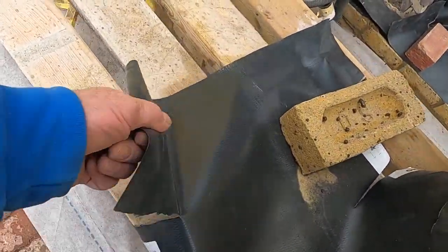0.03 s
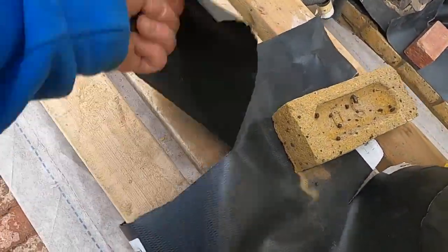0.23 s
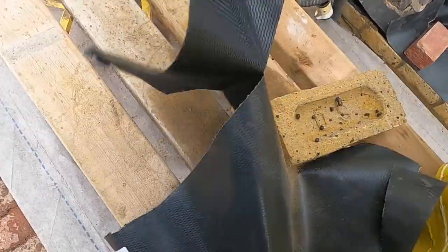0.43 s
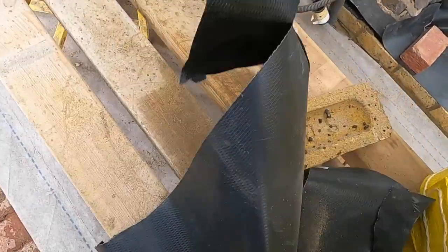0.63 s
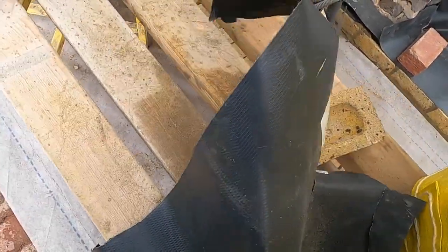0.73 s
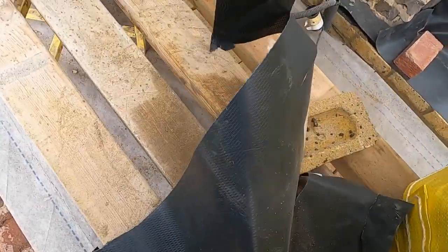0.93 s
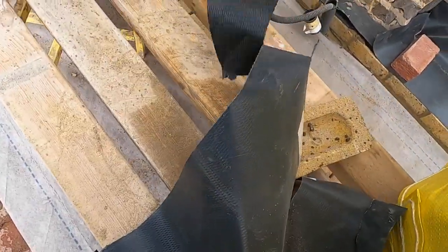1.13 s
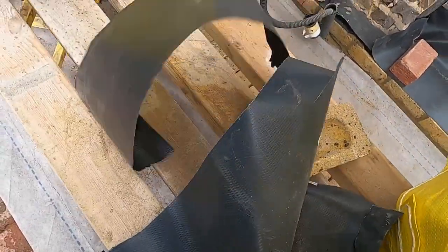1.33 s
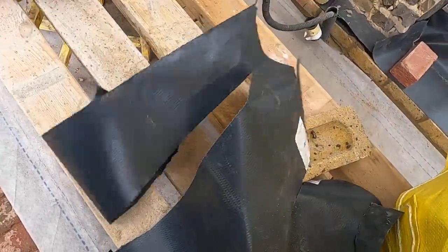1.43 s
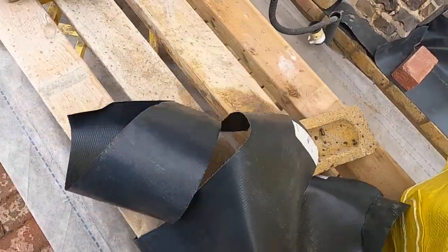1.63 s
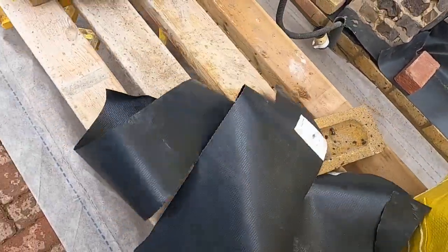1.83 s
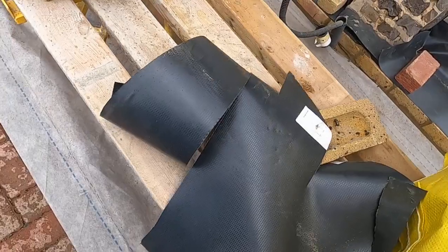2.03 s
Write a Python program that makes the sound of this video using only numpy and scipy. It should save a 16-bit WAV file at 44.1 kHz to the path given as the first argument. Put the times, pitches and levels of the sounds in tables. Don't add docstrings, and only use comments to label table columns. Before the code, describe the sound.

A tough plastic membrane tears with a loud rasping rip, then snaps, thumps and rustles down

```python
import sys
import numpy as np
from scipy import signal
from scipy.io import wavfile
from scipy.ndimage import uniform_filter1d

SR = 44100
rng = np.random.default_rng(int(sys.argv[2]) if len(sys.argv) > 2 else 0)


def attenuation_scalar(level_db):
    decades = np.asarray(level_db, float) / 20
    return 10 ** decades


def materialize(psi):
    bounded = np.clip(np.atleast_2d(psi).T, -1, 1)
    quanta = np.round(bounded * 32767).astype(np.int16)
    wavfile.write(sys.argv[1], SR, quanta)


N = 91948

# t/s, level/dB
ROAR = [(.236, -32), (.256, -17.5), (.30, -38.5), (.37, -23), (.43, -24), (.455, -25), (.472, -22.5),
        (.505, -17.5)]
# t/s, peak level/dB
FAST_JERKS = [(.2595, -1.5), (0.2654, -3), (0.2738, -14), (0.2807, -9), (0.2883, 0), (0.2972, -1),
              (0.3061, -11.5), (0.3112, -8.4), (0.3159, -7), (0.3229, -14.5), (0.3314, -5), (0.335, -22),
              (0.341, -4.5), (0.348, -13), (0.3529, -17), (0.3569, -16), (0.3629, -14), (0.3698, -5),
              (0.379, -21), (0.3877, -22), (0.3925, -14), (0.398, -8), (0.407, -12.5), (0.4204, -12),
              (0.4314, -17), (0.4365, -27), (0.445, -14), (0.4525, -7), (0.4699, -7.5), (0.474, -16),
              (0.4856, -2.5), (0.4922, -23)]
# t/s, peak level/dB
SLOW_JERKS = [(0.5, -13), (0.509, -11.5), (0.512, -9.5), (0.528, -6.5), (0.536, -18), (0.544, -12.5),
              (0.552, -13.5), (0.561, -12.5), (0.571, -10.5), (0.58, -17.5), (0.607, -12.5), (0.623, -12),
              (0.634, -17), (0.639, -27), (0.657, -17.5), (0.665, -20), (0.699, -16), (0.716, -21.5),
              (0.73, -12), (0.743, -29), (0.757, -26), (0.77, -16), (0.778, -19), (0.782, -37),
              (0.795, -16), (0.812, -17), (0.829, -44), (0.842, -17.5), (0.845, -18)]
# f/Hz, width/Hz, level/dB
SHEET_RESONANCES = [(670, 189, -3), (1106, 287, -4), (2230, 375, 0.5), (3180, 930, -5), (4250, 1130, -6),
                    (6450, 2900, -13.5)]
# t/s, level/dB
TENSION = [(.225, -27), (.265, -15), (.40, -14), (.435, -20.5), (.462, -33), (.484, -18.5), (.57, -27),
           (.62, -30), (.86, -31.5), (.9, -42)]
# f/Hz, level/dB, t60/s
DRUM_MODES = [(106, -41, .08), (144, -5.5, 0.052), (174, -3.5, 0.044), (199.6, 1.5, 0.075),
              (275.5, 0, 0.056), (380, 2, 0.029)]
# t/s, peak level/dB, ring f/Hz, ring t60/s, crack top f/Hz
SNAPS = [(.242, -12.5, 922, 0.023, 3170), (1.053, -28, 854, 0.042, 1520), (1.099, -26.5, 747, 0.012, 2460),
         (1.179, -24.5, 4200, 0.012, 8000), (1.448, -11.5, 1300, 0.066, 3100),
         (1.549, -22, 1680, 0.017, 1560), (1.592, -20, 4540, 0.037, 6200),
         (1.64, -12.5, 2770, 0.0081, 3550), (1.698, -21.5, 3700, 0.014, 3070),
         (1.714, -12.5, 2540, 0.026, 3300), (1.729, -20, 2240, 0.016, 2560),
         (1.807, -14, 1435, 0.0062, 5430), (1.897, -22, 810, 0.084, 1500),
         (1.914, -22.5, 1830, 0.032, 1960), (2.053, -26.5, 950, 0.032, 1150)]
# t/s, peak level/dB, f/Hz
TICKS = [(0.0258, -21.5, 1150), (0.0307, -27, 1390), (0.0381, -27, 1205), (0.046, -20.1, 1170),
         (0.0574, -26, 1068), (0.0661, -28, 1184), (0.0787, -21, 1076), (0.0905, -31, 3200),
         (0.1008, -16, 2600), (0.1108, -13, 3180), (0.116, -28, 3294), (0.1317, -20, 3220),
         (0.1574, -26, 3140), (0.1664, -13, 3294), (0.173, -15, 2710), (0.1766, -20.6, 1030),
         (0.1835, -18, 2906), (0.1966, -22, 3725), (0.2044, -31, 1070), (0.213, -14, 3280),
         (1.0569, -23, 1010), (1.0635, -21, 760), (1.0714, -19, 2800), (1.0866, -28, 2100),
         (1.348, -37, 1300), (1.3527, -37, 1170), (1.3664, -21.5, 1744), (1.3827, -22, 1076),
         (1.388, -27, 3337), (1.3916, -25, 1410), (1.398, -27, 747), (1.408, -50, 1916),
         (1.4182, -29, 1700), (1.4283, -23, 2400),
         (0.593, -21, 2070), (1.47, -27, 1130), (1.479, -28, 1162), (1.522, -23, 2740),
                  (1.5335, -25.5, 2900), (1.543, -19.5, 1140), (1.621, -32, 830), (1.646, -38, 2200),
                  (1.693, -17, 2750), (1.749, -26, 1980), (1.819, -34, 1313), (1.832, -17, 1260),
                  (1.857, -19, 4543), (1.883, -16, 900), (1.888, -31, 1227), (1.937, -25, 2090),
                  (1.959, -29, 2734), (1.978, -25, 1080), (2.019, -36, 1790), (2.036, -30, 1000)]
# t/s, peak level/dB, f/Hz, decay/cycles
THUMPS = [
    (0.5879, -12, 187, 18.6),
    (1.102, -15.5, 165, 3.5),
    (1.548, -15, 187, 6),
    (1.639, -19.5, 268, 4.5),
    (1.701, -18.5, 134, 2.5),
    (1.864, -16.5, 119, 2.1),
    (1.941, -16, 135, 3.5),
    (1.984, -11.5, 227, 1.6),
    (2.008, -15, 90.5, 1.8),
]
# start t/s, length/s, level/dB, grip share/0-1
SLIDES = [(-.08, 0.24, -39.5, 1), (0.049, 0.18, -34.5, 1), (0.234, 0.13, -23, 0.03),
          (0.393, 0.16, -27, 0.02), (0.638, 0.067, -29, 0.96), (0.677, 0.17, -34.5, 1),
          (0.579, 0.073, -37, 0.05), (0.956, 0.036, -50, 1), (1.038, 0.039, -37, 1),
          (1.231, 0.095, -48, 0.01), (1.337, .055, -34, 0), (1.491, 0.093, -31, 0.39), (1.6, .03, -37, .1),
          (1.662, 0.057, -36, 0), (1.828, 0.13, -36, 0), (1.935, 0.09, -36, 0), (2, 0.059, -53, 0)]
# start t/s, level/dB, decay/s
SHIVERS = [
    (0.862, -41, 0.042),
    (1.177, -42.5, 0.0066),
    (1.449, -25.5, 0.038),
    (1.636, -33.5, 0.053),
    (1.729, -35, 0.076),
    (1.808, -32, 0.22),
]
# f/Hz, density level/dB per Hz
LOOSE_SPECTRUM = [(250, -3.5), (460, -3.5), (700, -5.5), (2000, -6), (4000, -13.5), (8000, -23.5),
                  (12500, -94), (15500, -57)]
# f/Hz, density level/dB per Hz
GRIPPED_SPECTRUM = [(250, 1.5), (980, 4), (1800, 0), (3250, 0.5), (4600, -12), (7000, -20.5), (12000, -62),
                    (15500, -57)]
# lag/s, left level/dB, right level/dB
ECHOES = [(.0011, -24.5, -27.5), (.0023, -21, -24.5), (.0047, -13.5, -28)]
# f/Hz, correlation/-1 to 1
LIKENESS = [(30, -.1), (70, .2), (150, .95), (1000, .85), (2500, .9), (5000, .35), (10000, -.1)]
# t/s, level/dB
GUSTS = [
    (0, -28),
    (.2, -32.5),
    (.4, -57),
    (.6, -74),
    (.95, -41.5),
    (1.3, -40),
    (1.6, -32.5),
    (1.8, -32),
    (2.0, -28),
    (2.085, -30.5),
]
# f/Hz, density level/dB per Hz
WIND_SPECTRUM = [(20, -5.5), (45, -0.5), (85, -5), (150, -9.5), (350, -25)]
# f/Hz, density level/dB per Hz
SITE_SPECTRUM = [(200, -15.5), (490, -10.5), (1000, -7.5), (2500, -14), (5800, -26.5), (15500, -53)]

JERK_S, JERK_GAIN_DB, JERK_SPIKE = 0.00065, -1, 2.39
LOW_GROWS_DB_PER_S = 26.5
FAST_GAIN_DB, FAST_SMEAR_HZ = 2, 132
ROAR_SHARE, ROAR_GAIN_DB = 0.28, 10.5
COLOUR_SPREAD_DB, TEAR_TOP_HZ, DRUM_NOISE = 0.5, 5820, 0.4
SNAP_SPIKE, RING_KICK, CRACK_T60_S = 4.5, 7, 0.012
SNAP_CRACK_DB, SNAP_RING_DB, SNAP_AIR_HZ = 10.5, -0.5, 11000
TICK_S, TICK_WIDTH, TICK_BROAD = 0.001, 1.154, 0.72
TICK_GAIN_DB, TICK_TOP_HZ = -5.5, 5200
THUMP_SOFT_HZ = 900
GRAINS_PER_S, GRAIN_SPREAD_DB, CLUMP_DB, RUSTLE_PATCH_DB = 1800, 4.5, 3.5, 2.2
SLIDE_RISE, SLIDE_FALL_S = 0.45, 0.014
LEFT_LAG, PORT_SPLIT_HZ, PORT_SPLIT_DB, LOW_SIDE_DB = 2, 4500, -4.0, -21
WIND_LEFT_DB, SITE_DB = 1.5, -50.5
RIGHT_LIFT_DB, RIGHT_LIFT_HZ, TOP_HZ = 7.0, 10000, 15950


def rms_one(x):
    return x / np.sqrt(np.mean(x ** 2) + 1e-20)


def in_time(rows):
    t, level_db = np.transpose(rows)
    return np.interp(np.arange(N) / SR, t, level_db, left=-90, right=-90)


def at_hz(points, hz):
    f, value = np.transpose(points)
    return np.interp(np.log(hz), np.log(f), value)


def drift(rate_hz):
    r = np.exp(-2 * np.pi * rate_hz / SR)
    wander = signal.lfilter([1], [1, -2 * r, r * r], rng.standard_normal(N + 9000))
    return rms_one(wander[9000:])


def ring(x, hz, t60):
    r, w = attenuation_scalar(-60 / (t60 * SR)), 2 * np.pi * hz / SR
    return signal.lfilter([0, np.sin(w)], [1, -2 * r * np.cos(w), r * r], x + 1e-18)


def cut(x, hz, kind, order=2):
    return signal.sosfilt(signal.butter(order, hz, kind, fs=SR, output="sos"), x)


def clicks(s, db):
    out = np.zeros(N)
    np.add.at(out, (np.asarray(s) * SR).astype(int), attenuation_scalar(db))
    return out


def banded(spectrum, patchy_db, rate_hz, source):
    lowest, highest = spectrum[0][0], spectrum[-1][0]
    edges = np.geomspace(lowest, highest, int(2 * np.log2(highest / lowest)) + 2)
    out = 0
    for k, (low, high) in enumerate(zip(edges, edges[1:])):
        mid, side = cut(source[k % 2], [low, high], "band")
        hz = np.sqrt(low * high)
        alike = np.clip(at_hz(LIKENESS, hz), -1, 1)
        gain = attenuation_scalar(at_hz(spectrum, hz) + patchy_db * drift(rate_hz))
        out = out + gain * (np.sqrt(1 + alike) * mid + np.sqrt(1 - alike) * side * [[1], [-1]])
    return rms_one(out)


def fracture():
    fast_s, fast_db = np.transpose(FAST_JERKS)
    s, db = np.transpose(SLOW_JERKS)
    noise = rng.standard_normal(N)
    noise[(s * SR).astype(int)[:, None] + int(JERK_S * SR) + np.arange(5)] = JERK_SPIKE
    fast = cut(clicks(fast_s, fast_db + FAST_GAIN_DB), FAST_SMEAR_HZ, "low", order=1)
    roar = ROAR_SHARE * noise * attenuation_scalar(in_time(ROAR) + ROAR_GAIN_DB)
    decay = np.exp(-1 / (JERK_S * SR))

    def bursts(extra_db):
        hits = fast + clicks(s, db + extra_db + JERK_GAIN_DB)
        envelope = signal.lfilter([np.e * (1 - decay)], [1, -2 * decay, decay ** 2], hits)
        return noise * envelope + roar

    high, low = bursts(0), bursts(LOW_GROWS_DB_PER_S * (s - s[0]))
    crack = 0
    for k, (hz, width_hz, peak_db) in enumerate(SHEET_RESONANCES):
        r, w = np.exp(-np.pi * width_hz / SR), 2 * np.pi * hz / SR
        zeros, poles = [(1 - r * r) / 2, 0, (r * r - 1) / 2], [1, -2 * r * np.cos(w), r * r]
        gain = (-1) ** k * attenuation_scalar(peak_db + 5.5 + COLOUR_SPREAD_DB * drift(53.0))
        crack = crack + gain * signal.lfilter(zeros, poles, (low if k < 2 else high) + 1e-18)
    return cut(crack, TEAR_TOP_HZ, "low", order=3)


def drumming():
    fast_s, s = np.transpose(FAST_JERKS)[0], np.transpose(SLOW_JERKS)[0]
    pushes = clicks(fast_s, 0 * fast_s) + clicks(s, 0 * s)
    push = rms_one(pushes) + DRUM_NOISE * rng.standard_normal(N)
    drum = -sum(attenuation_scalar(db) * ring(push, hz, t60) for hz, db, t60 in DRUM_MODES)
    level = np.sqrt(uniform_filter1d(drum ** 2, size=1800) + 1e-9)
    return cut(drum / level * attenuation_scalar(in_time(TENSION)), 474, "low")


def snaps():
    out, t = np.zeros(N + SR), np.arange(SR // 8) / SR
    for s, db, hz, t60, top_hz in SNAPS:
        crack, tone = rng.standard_normal((2, len(t)))
        crack[:3], tone[0] = -SNAP_SPIKE, RING_KICK
        crack = cut(crack * attenuation_scalar(-60 * t / CRACK_T60_S), 480, "high")
        crack = cut(crack, top_hz, "low", order=3)
        tone = cut(tone * attenuation_scalar(-60 * t / t60), [hz * .985, hz * 1.04], "band", order=1)
        crack = attenuation_scalar(SNAP_CRACK_DB) * crack / np.abs(crack).max()
        tone = attenuation_scalar(SNAP_RING_DB) * tone / np.abs(tone).max()
        i = int(s * SR)
        out[i:i + len(t)] += attenuation_scalar(db) * (crack + tone) / 2
    return cut(out[:N], SNAP_AIR_HZ, "low")


def ticks():
    out, t = np.zeros(N + SR), np.arange(SR // 50) / SR
    for s, db, hz in TICKS:
        noise = rng.standard_normal(len(t)) * t * np.exp(-t / TICK_S)
        pitched = rms_one(cut(noise, [hz / TICK_WIDTH, hz * TICK_WIDTH], "band"))
        burst = pitched + TICK_BROAD * rms_one(cut(noise, [500, 5500], "band"))
        i = int(s * SR)
        out[i:i + len(t)] += attenuation_scalar(db + TICK_GAIN_DB) * burst / np.abs(burst).max()
    return cut(out[:N], TICK_TOP_HZ, "low", order=5)


def thumps():
    out = 0
    for s, db, hz, cycles in THUMPS:
        sign = 1 if 1 < s < 1.8 else -1
        out = out + sign * ring(clicks([s], [db + 2.5]), hz, cycles / hz)
    return cut(out, THUMP_SOFT_HZ, "low")


def nearby(x):
    low = cut(x, PORT_SPLIT_HZ, "low", order=1)
    split = attenuation_scalar(PORT_SPLIT_DB) * np.roll(cut(x, PORT_SPLIT_HZ, "high"), 23)
    split = split + attenuation_scalar(LOW_SIDE_DB) * cut(np.roll(x, 60), 400, "low")
    out = np.array([np.roll(low, LEFT_LAG) + x - low + split, x - split])
    for lag, left_db, right_db in ECHOES:
        out += attenuation_scalar([[left_db], [right_db]]) * cut(np.roll(x, int(lag * SR)), [500, 6000], "band")
    return out


def rustle():
    clump = attenuation_scalar(CLUMP_DB * drift(45.0))
    born = rng.random((2, 1, N)) < GRAINS_PER_S * clump / SR
    size = attenuation_scalar(GRAIN_SPREAD_DB * np.minimum(rng.exponential(1, (2, 1, N)), 4))
    grains = (born * size + 1.05) * rng.standard_normal((2, 2, N)) * np.sqrt(clump)
    t, gripped, loose = np.arange(N) / SR, 0, 0
    for s, length, db, grip in SLIDES:
        rise = np.clip((t - s) / (SLIDE_RISE * length), 0, 1) ** 2
        fall = np.exp(-2 * np.maximum(t - s - length, 0) / SLIDE_FALL_S)
        power = attenuation_scalar(2 * db) * rise * fall
        gripped, loose = gripped + grip * power, loose + (1 - grip) * power
    for s, db, decay in SHIVERS:
        loose = loose + (t >= s) * attenuation_scalar(2 * db) * np.exp(-2 * np.abs(t - s) / decay)
    hiss = banded(GRIPPED_SPECTRUM, RUSTLE_PATCH_DB, 36.0, grains)
    airy = banded(LOOSE_SPECTRUM, RUSTLE_PATCH_DB, 17.7, grains[::-1])
    return np.sqrt(gripped) * hiss + np.sqrt(loose) * airy


def wind():
    level = attenuation_scalar(in_time(GUSTS) + WIND_LEFT_DB * np.array([[1], [-1]]))
    return level * banded(WIND_SPECTRUM, 3.3, 5.3, rng.standard_normal((2, 2, N)))


def site_hum():
    return attenuation_scalar(SITE_DB) * banded(SITE_SPECTRUM, 8.8, 11.2, rng.standard_normal((2, 2, N)))


def scene():
    background = wind() + site_hum()
    sheet = fracture() + drumming() + snaps() + ticks() + thumps()
    return nearby(sheet) + rustle() + background


def band_limit(x):
    return signal.sosfilt(signal.butter(12, 15920, fs=SR, output="sos"), x)


def record(dry):
    right = dry[1] + (attenuation_scalar(RIGHT_LIFT_DB) - 1) * cut(dry[1], RIGHT_LIFT_HZ, "high")
    rounded = 0.84 * np.tanh(np.array([dry[0], right]) / 0.67)
    top = signal.cheby2(12, 60, TOP_HZ, fs=SR, output="sos")
    mix = signal.sosfilt(top, cut(rounded, 17, "high"))
    return band_limit(mix)


dry = scene()
out = record(dry)
materialize(out)
```